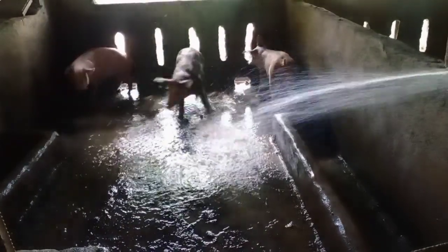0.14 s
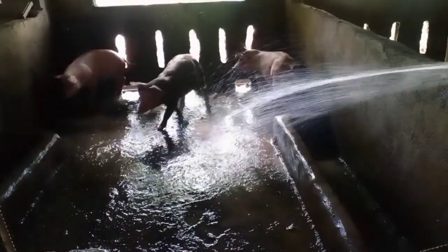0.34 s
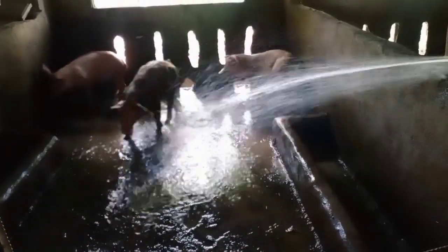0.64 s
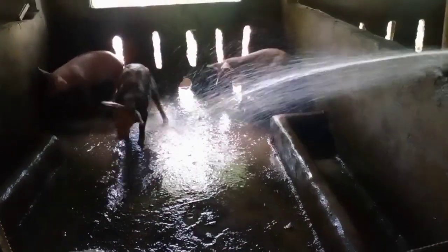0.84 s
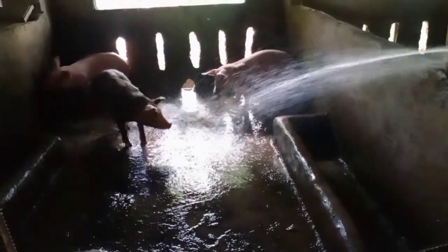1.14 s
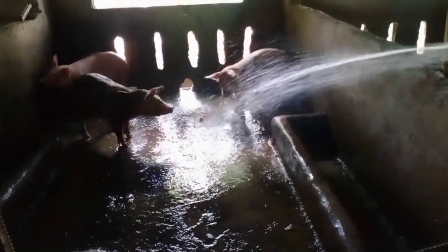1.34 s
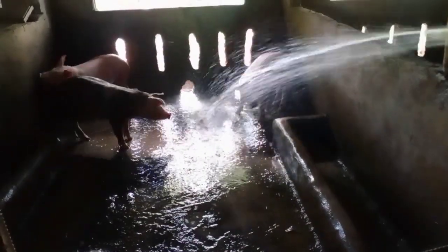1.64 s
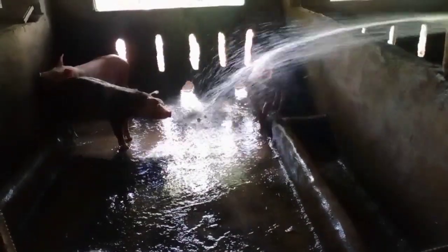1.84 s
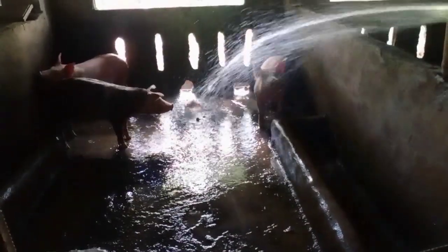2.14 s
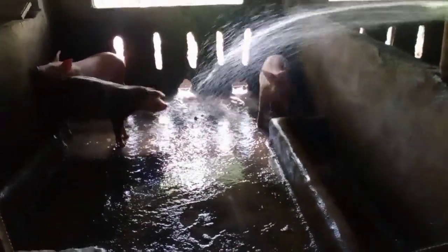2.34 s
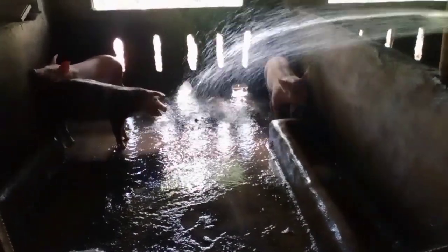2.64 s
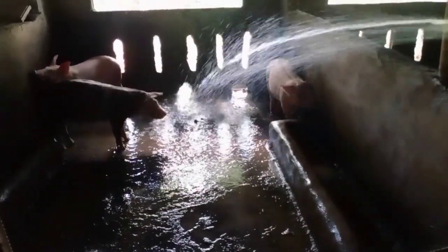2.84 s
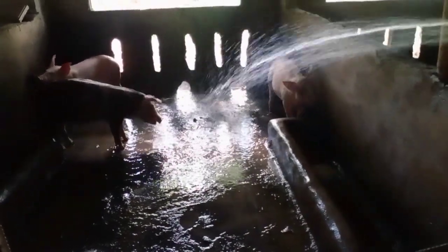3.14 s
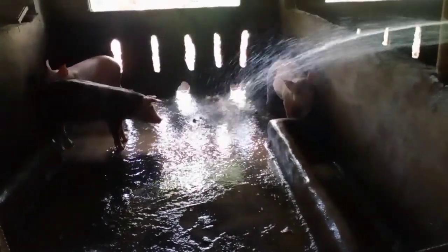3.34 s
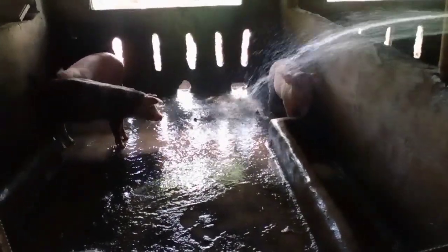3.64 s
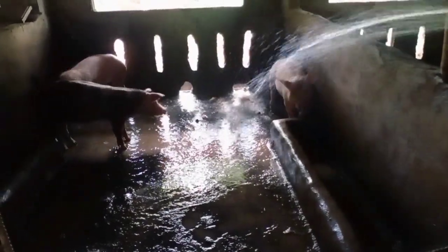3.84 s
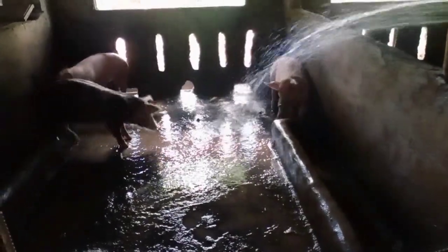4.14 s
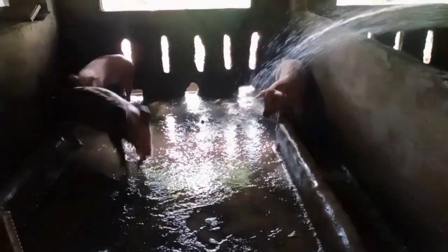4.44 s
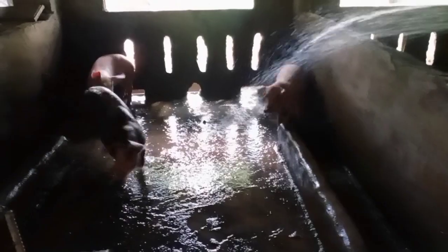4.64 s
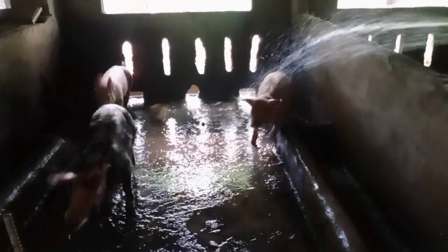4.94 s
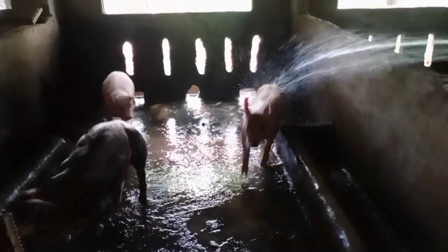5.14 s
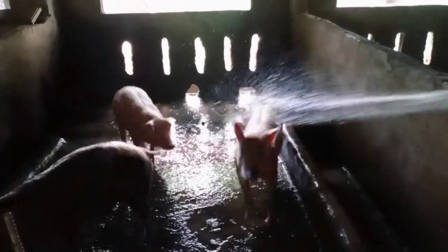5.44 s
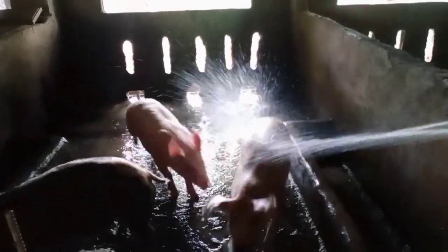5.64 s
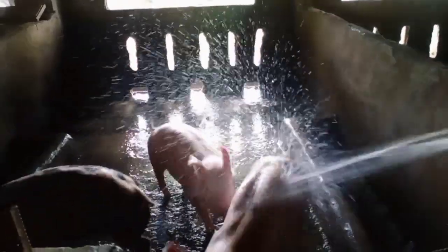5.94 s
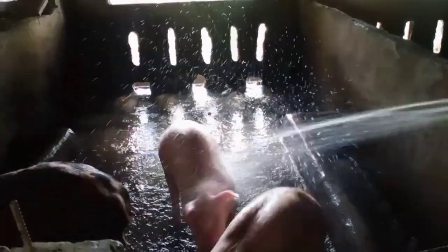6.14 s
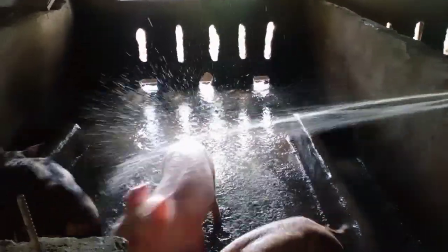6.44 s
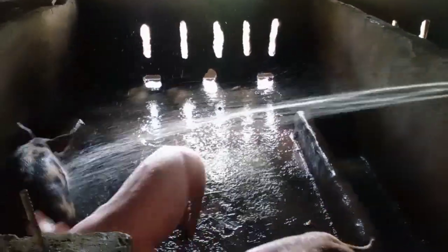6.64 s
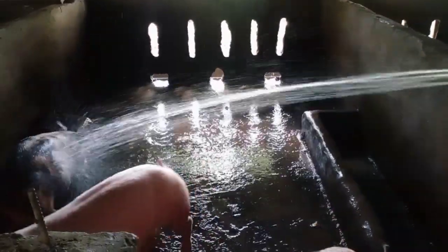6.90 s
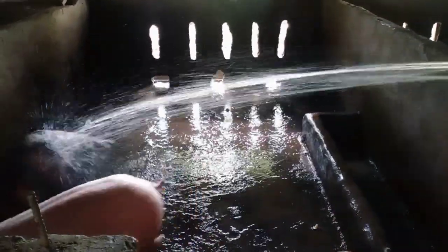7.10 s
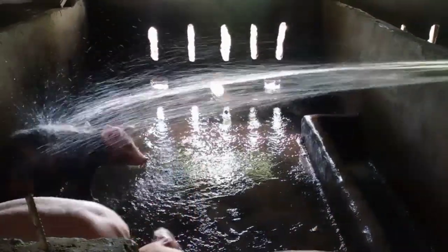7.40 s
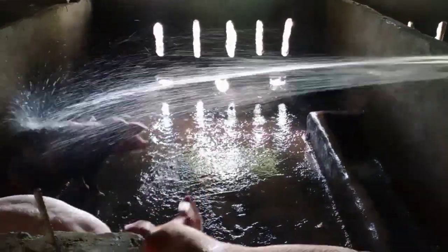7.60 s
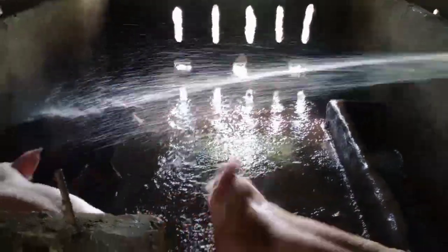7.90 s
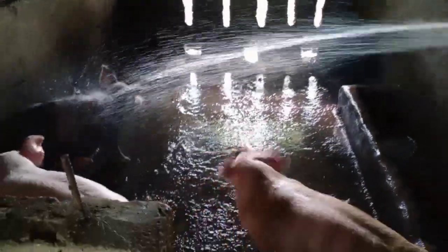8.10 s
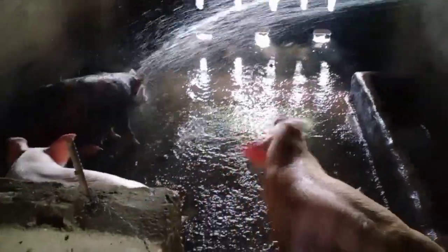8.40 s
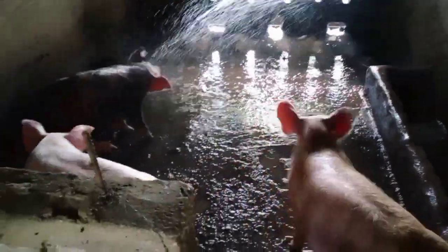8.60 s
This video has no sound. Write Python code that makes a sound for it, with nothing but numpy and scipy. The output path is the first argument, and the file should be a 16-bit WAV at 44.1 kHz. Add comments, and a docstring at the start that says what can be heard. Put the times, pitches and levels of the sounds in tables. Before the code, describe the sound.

Water jet hisses steadily onto wet concrete, splattering and slapping in puddles while pigs grunt briefly and bodies bump dully in a bare pen.

```python
"""Wet concrete pig pen, hosed down and heard through one small microphone near the nozzle.
The nozzle rings steadily; fine drops hiss as filtered random impacts, heavy ones splatter in puddles
and slugs of water drum on the pigs as low struck notes. Hollow notes sink as the jet slides.
Hooves and slaps splash as dying drop showers, bodies and feet bump dully, and pigs grunt through
throat resonances. Bare walls add a brief reverberation, dying at its own speed in each band."""
import sys
import numpy as np
from scipy import signal
from scipy.io import wavfile

SR = 44100
rng = np.random.default_rng(int(sys.argv[2]) if len(sys.argv) > 2 else 0)


def transcribe(u):
    """Save the signal u as a 16-bit wav file named by the first command-line argument.

    u: samples, shape (n,) or (channels, n), limited to [-1, 1]; the rate is SR.
    q: integer samples, one column per channel.
    """
    v = np.clip(np.atleast_2d(u).T, -1, 1)
    q = np.round(v * 32767).astype(np.int16)
    wavfile.write(sys.argv[1], SR, q)


N = 386316
TIME = np.arange(N) / SR

# Fine spray, loudest where the jet lands close and hard. Each row: time in seconds, relative level in dB.
SPRAY_CURVE = [(0.1, -27), (4.13, -28.5), (5.84, -21.5), (5.91, -31.5), (6.03, -26.5), (6.29, -38),
               (6.34, -27.5), (6.7, -31.5), (6.73, -26.5), (7.42, -27), (7.59, -35), (7.83, -24),
               (8.09, -25), (8.16, -36), (8.19, -27), (8.38, -38), (8.43, -28.5), (8.72, -28)]
# Spectrum of a low thud. Each row: frequency in Hz, relative density in dB.
THUD_SPECTRUM = [(50, -34), (120, -12), (195, -0.5), (420, 1.5), (640, 4), (1500, -47)]


def amp(db):
    """Decibels to gain."""
    return 10 ** (np.asarray(db) / 20)


def evened(x):
    """Scales to rms 1."""
    return x / np.sqrt(np.mean(x ** 2) + 1e-20)


def read(points, hz):
    """Reads a table along a log-frequency axis."""
    f, value = np.transpose(points)
    return np.interp(np.log(hz + 1), np.log(f + 1), value)


def follow(rows, t):
    """Every column of a curve table at the times t."""
    s, *columns = np.transpose(rows)
    return [np.interp(t, s, c) for c in columns]


def add(mix, s, sound):
    """Mixes a sound in at time s."""
    part = mix[max(round(s * SR), 0):][:len(sound)]
    part += sound[:len(part)]


def colour(x, spectrum):
    """Causal minimum-phase filter with the given spectrum; white noise keeps its power."""
    hz = abs(np.fft.fftfreq(4096, 1 / SR))
    log_gain = np.log(amp(read(spectrum, hz)))
    taps = np.fft.ifft(np.exp(np.conj(signal.hilbert(log_gain)))).real[:2048]
    return signal.oaconvolve(x, taps / np.linalg.norm(taps))[:len(x)]


def resonate(x, hz, width_hz):
    """A resonance of gain 1, fixed or moving: shift to 0 Hz, smooth, shift back."""
    turn = np.exp(2j * np.pi * np.cumsum(hz * np.ones(len(x))) / SR)
    r = np.exp(-np.pi * width_hz / SR)
    smooth = signal.lfilter([1 - r], [1, -r], x / turn + 1e-18)
    return 2 * (turn * smooth).real


def cavity(x, modes, factor=1, tilt_db=0):
    """Steep-sided resonances side by side, scaled in pitch and tilted in dB per octave above the first."""
    out = 0
    for hz, width_hz, db in modes:
        centre_hz, spread_hz = hz * factor, width_hz * np.mean(factor)
        ring = resonate(resonate(x, centre_hz, spread_hz), centre_hz, spread_hz)
        out = out + amp(db + tilt_db * np.log2(hz / modes[0][0])) * ring
    return out


def drops(n, per_s, spread_db):
    """Random impacts of either sign: many small, a few large."""
    size = amp(spread_db * np.minimum(rng.exponential(1, n), 5))
    return evened(size * rng.choice([-1, 1], n) * (rng.random(n) < per_s / SR))


def slugs(per_s, fade_s, depth):
    """The jet breaks into slugs: each lands at once and scatters for a moment."""
    landings = rng.exponential(1, N) * (rng.random(N) < per_s / SR)
    power = signal.lfilter([1], [1, -np.exp(-1 / (fade_s * SR))], landings)
    share = np.clip(depth, 0, 1)
    return np.sqrt(1 - share + share * power / power.mean())


def crossings(rows, rise_s, fade_db_per_s, release_s):
    """Strength over time as the jet crosses one thing after another: quick rise, slow fade, release."""
    strength = 0
    for start_s, length_s, level_db in rows:
        age_s = np.maximum(TIME - start_s, 0)
        rise = np.minimum(age_s / rise_s, 1)
        release = np.exp(-np.maximum(age_s - length_s, 0) / release_s)
        strength = strength + amp(level_db - fade_db_per_s * age_s) * rise * release
    return strength


def nozzle():
    """Turbulence rings the hose end, steadily."""
    # Hose and nozzle modes. Each row: frequency in Hz, width in Hz, relative level in dB.
    hose_modes = [(883, 72, -5), (1384, 17, 5), (1653, 50, -3), (1877, 37, -1), (1982, 50, 1),
                  (2524, 73, 3.5)]
    return amp(-41.5) * evened(cavity(rng.standard_normal(N), hose_modes))


def spray():
    """Fine drops tick on concrete, in clumps; the finest mist adds a top fizz."""
    # Spectra of ticks and fizz. Each row: frequency in Hz, relative density in dB.
    hiss_spectrum = [(600, -49), (1100, -26), (2200, -27.5), (2800, -10), (3800, -2), (5100, -1.5),
                     (6850, 3.5), (7600, -4), (9300, -22), (10700, -20), (11400, -25), (15500, -50)]
    mist_spectrum = [(8000, -29), (11300, -18.5), (12300, -7), (15300, -1.5)]
    hiss_offset_db = 2
    mist_mean_db, mist_db_per_spray_db = -31.5, 0.87
    level_db, = follow(SPRAY_CURVE, TIME)
    ticks = drops(N, per_s=14000, spread_db=0.5) * slugs(per_s=150, fade_s=0.005, depth=0.36)
    fizz = drops(N, per_s=23000, spread_db=4.0) * slugs(per_s=200, fade_s=0.004, depth=0.26)
    mist_db = mist_mean_db + mist_db_per_spray_db * (level_db - level_db.mean())
    hiss = amp(level_db + hiss_offset_db) * colour(ticks, hiss_spectrum)
    return hiss + amp(mist_db) * colour(fizz, mist_spectrum)


def splatter():
    """Heavy drops burst in the puddles; the harder they land, the more they churn the water."""
    # The jet's heavy core sweeps through standing water.
    # Each row: start in seconds, length in seconds, level in dB before the fade.
    pours = [(1.84, 0.6, -31), (2.45, 1.07, -30), (3.62, 1.08, -29), (4.55, 1.1, -38), (7.76, 0.47, -30.5),
             (8.46, 0.34, -43.5)]
    # Spectra of bursts and churn. Each row: frequency in Hz, relative density in dB.
    puddle_spectrum = [(650, -37), (1400, -6.5), (2200, 0.5), (3400, 2.5), (4300, 1.5), (9000, -44.5)]
    churn_spectrum = [(480, -40.5), (780, -9.5), (1150, 3), (1700, 5), (4000, -22)]
    stray_offset_db = -8.5  # heavy drops that always fall with the spray, relative to it
    churn_ref_db, splatter_ref_db, churn_db_per_splatter_db = -36, -27, 1.82
    spray_db, = follow(SPRAY_CURVE, TIME)
    # lands, moves on to shallower water, leaves
    poured = crossings(pours, rise_s=0.082, fade_db_per_s=7, release_s=0.08)
    level_db = 20 * np.log10(amp(spray_db + stray_offset_db) + poured)
    bursts = drops(N, per_s=6000, spread_db=1.5) * slugs(per_s=48, fade_s=0.016, depth=0.77)
    churn_db = churn_ref_db + churn_db_per_splatter_db * (level_db - splatter_ref_db)
    return amp(level_db) * colour(bursts, puddle_spectrum) + amp(churn_db) * colour(bursts, churn_spectrum)


def drumming():
    """Slugs of water thump on backs and flanks, each at its own pitch, over a faint rumble."""
    # The jet catches a pig. Each row: start in seconds, length in seconds, level in dB before the fade.
    soakings = [(1.6, 0.81, -62), (3.52, .15, -42.5), (3.698, 1, -37.5), (4.73, 0.83, -47),
                (5.175, 0.71, -40), (6.64, 0.59, -45.5), (7.798, 0.12, -36)]
    # Thump level against pitch, and rumble spectrum. Each row: frequency in Hz, relative level in dB.
    hide_response = [(70, -3), (220, 3.5), (750, 0)]
    rumble_spectrum = [(20, -18), (75, 3), (150, -13.5), (600, -16), (1500, -25)]
    stray_db = -66.5  # stray water that drums all the time
    # lands, slides off slowly, leaves
    soaked = crossings(soakings, rise_s=0.053, fade_db_per_s=25, release_s=0.29)
    thumps = np.zeros(N)
    for when, pitch, size in rng.random((1600, 3)):
        hz = 75 * (750 / 75) ** pitch
        level_db = read(hide_response, hz) + 11 * size ** 3
        add(thumps, *bump(when * N / SR, level_db, hz, ring_s=0.0085))
    rumble = amp(-61) * colour(rng.standard_normal(N), rumble_spectrum)
    return (amp(stray_db) + soaked) * evened(thumps) + rumble


def grunt(start_s, loudest_s, end_s, pulses_per_s, level_db, rough, opening, factor):
    """Slow, uneven flaps of the larynx and pulsing rasp pass the throat; the chest booms underneath."""
    # Throat with snout open and shut. Each row: frequency in Hz and width in Hz, both before the
    # factor and glide, relative level in dB before the effort tilt.
    open_throat = [(272, 63, 7.5), (903, 77, 0), (1780, 340, 3), (2900, 160, 11), (3530, 380, 8)]
    shut_throat = [(231, 120, 1), (412, 170, 6.5), (650, 720, -11.5), (1520, 430, -1), (2027, 63, 6.5)]
    t = np.arange(start_s, end_s, 1 / SR)
    turns = (t - start_s) * pulses_per_s
    flaps = np.diff(np.floor(turns), prepend=0) * amp(2 * rng.standard_normal(len(t)))
    rasp = evened((0.86 + np.exp(-(turns % 1) / 0.11)) * rng.standard_normal(len(t)))
    rough, opening = np.clip([rough, opening], 0, 1)
    drive = (1 - rough) * evened(flaps) + rough * rasp
    effort_db = -24 * np.interp(t, [start_s, loudest_s, end_s], [1, 0, 1]) ** 1.47
    # resonances rise through the call, and effort brightens it
    glide = factor * (1 + 0.61 * (t - loudest_s))
    tilt_db = 0.086 * effort_db
    wide = evened(cavity(drive, open_throat, glide, tilt_db))
    shut = evened(cavity(drive, shut_throat, glide, tilt_db))
    chest = amp(-7) * evened(cavity(rasp, [(161, 210, 0)])) + amp(-16.5) * colour(rasp, THUD_SPECTRUM)
    voice = opening * wide + (1 - opening) * shut + chest / factor ** 2
    return start_s, amp(level_db + effort_db) * voice * signal.windows.tukey(len(t), .08)


def bump(s, level_db, hz, ring_s=0.0045):
    """A soft mass is struck: one low note that swells and dies quickly."""
    t = np.arange(SR // 8) / SR
    u = t / ring_s
    return s, amp(level_db) * u * np.exp(1 - u) * np.sin(2 * np.pi * hz * t)


def splash(s, slap_db, slosh_db, slosh_hz):
    """A sharp slap, then a dying shower of thrown drops; the pocket of air it opens rings over a thud."""
    # Slap and shower spectrum. Each row: frequency in Hz, relative density in dB.
    spatter_spectrum = [(900, -38.5), (1800, 3), (3500, 10.5), (4800, 2.5), (6700, 5), (9300, -32),
                        (15000, -45)]
    thud_offset_db, thud_db_per_octave = -11, -10.5  # lower pockets thud more
    t = np.arange(SR // 3) / SR
    shower = drops(len(t), per_s=6000, spread_db=1.0) * np.exp(-t / 0.042)
    slap = 2.2 * rng.standard_normal(len(t)) * np.exp(-t / .0035)
    bright = amp(slap_db - 11.5) * colour(shower + slap, spatter_spectrum)
    plunge = shower + .5 * slap
    pocket = [(slosh_hz * ratio, db) for ratio, db in [(.3, -17), (.7, -1), (1, 8.5), (1.4, 0), (4, -29.5)]]
    slosh = amp(slosh_db - 2.0) * colour(plunge, pocket)
    octaves = np.log2(slosh_hz / 1000)
    thud_db = slosh_db + thud_offset_db + thud_db_per_octave * octaves
    return s, bright + slosh + amp(thud_db) * colour(plunge, THUD_SPECTRUM)


def slide(rows):
    """The jet slides over a surface: broken splatter heard through a sinking resonance."""
    t = np.arange(rows[0][0], rows[-1][0], 1 / SR)
    hz, level_db = follow(rows, t)
    width_hz = 0.18 * hz.mean()
    broken = drops(len(t), per_s=700, spread_db=2.0)
    note = resonate(resonate(broken, hz, width_hz), hz, width_hz)
    return t[0], amp(level_db) * evened(note) * signal.windows.tukey(len(t), .15)


def pen(x, wet_db):
    """Direct sound plus dense wall reflections, each band dying at its own speed."""
    # Reverberation of the pen. Each row: frequency in Hz, 60 dB decay time in seconds.
    decay_times = [(200, 0.33), (2000, 0.56), (14000, 0.078)]
    late = np.arange(SR) > .006 * SR
    taps = rng.choice([-1., 1.], SR) * (rng.random(SR) < 2500 / SR) * late
    hz, t, z = signal.stft(taps, SR, nperseg=256)
    decay = amp(-60 * t / read(decay_times, hz)[:, None])
    tail = signal.istft(z * decay, SR, nperseg=256)[1]
    echo = signal.fftconvolve(x, tail / np.linalg.norm(tail))[:N]
    return (x + amp(wet_db) * echo) / np.sqrt(1 + amp(wet_db) ** 2)


def scene():
    """Water and pigs in the pen, the same in both channels."""
    # Pig calls. Each row: start, loudest point and end in seconds (a loudest point past the end: cut off
    # while rising), pulses per second, relative level in dB, roughness 0-1, snout opening 0-1,
    # factor on the throat's resonances.
    grunts = [(0.682, 0.762, 0.76, 55, -27.5, 0.78, 0, 2.26), (1.876, 1.975, 2.09, 46.6, -21, .06, 1, 1),
              (2.327, 2.4, 2.392, 45, -38.5, 0.6, 0.5, 1.16),
              (2.556, 2.603, 2.85, 56, -55.5, 0.1, 0.5, 0.6), (5.875, 5.975, 6.077, 44, -20.5, .7, 0.16, 1),
              (6.578, 6.7, 6.69, 55, -30, 0.3, 0.33, 1.8)]
    # Dull bumps of bodies and feet. Each row: start in seconds, relative level in dB, frequency in Hz.
    bumps = [(0.763, -37, 109), (0.935, -40, 77), (1.757, -41, 90), (1.871, -33, 126), (2.601, -37.5, 220),
             (3.53, -44, 298), (4.768, -24, 150), (4.775, -29.5, 327), (5.629, -31.5, 307),
             (6.959, -34.5, 217)]
    # Splashes of hooves and slaps of water. Each row: start in seconds, relative slap level in dB,
    # relative slosh level in dB, slosh frequency in Hz.
    splash_rows = [(0.887, -8.5, -44, 1010), (1.018, -10.5, -61, 900), (3.660, -8.5, -16, 1030),
                   (3.721, -8.5, -15.5, 1050), (4.032, -17, -25, 1400), (4.191, -16, -22.5, 1330),
                   (4.383, -6.5, -26, 1280), (5.236, -23, -32.5, 724), (6.999, -18.5, -50, 1200),
                   (7.733, -21, -20.5, 940), (7.817, -28, -16, 860), (7.903, -22, -23.5, 1340),
                   (7.995, -12, -14.5, 1150), (8.087, -7, -16.5, 605), (8.129, -23, -26, 450),
                   (8.182, -11, -21, 970), (8.646, -12, -25, 1010), (8.687, -7, -24, 1180)]
    # One list per sinking note. Each row: time in seconds, frequency in Hz, relative level in dB.
    slides = [
        [(2.05, 1480, -44), (2.24, 1150, -30.5), (2.30, 810, -37.5), (2.38, 650, -38)],
        [(2.49, 1370, -51), (2.77, 870, -44), (2.84, 790, -44)],
        [(2.6, 4050, -34), (2.87, 3660, -28), (3.2, 3250, -32)],
        [(7.08, 1260, -38), (7.26, 855, -54.5), (7.38, 850, -39.5), (7.69, 704, -49.5)],
    ]
    water, splashes, pigs = splatter() + drumming(), np.zeros(N), np.zeros(N)
    for row in grunts:
        add(pigs, *grunt(*row))
    for row in bumps:
        add(splashes, *bump(*row))
    for row in splash_rows:
        add(splashes, *splash(*row))
    for rows in slides:
        add(water, *slide(rows))
    mono = nozzle() + pen(spray(), wet_db=-16.5) + pen(water, wet_db=-12.0)
    mono = mono + pen(splashes, wet_db=-8.0) + pen(pigs, wet_db=-4.0)
    return np.array([mono, mono])


def record(dry):
    """The deep bass below about 60 Hz is cut away; then the band limit."""
    edge_hz = 15600
    thin = signal.sosfilt(signal.butter(2, 62, "highpass", fs=SR, output="sos"), dry)
    lowpass = signal.firwin(511, edge_hz, window=("kaiser", 9), fs=SR)
    return signal.oaconvolve(thin, lowpass[None], "same", axes=1)


dry = scene()
out = record(dry)
transcribe(out)
```